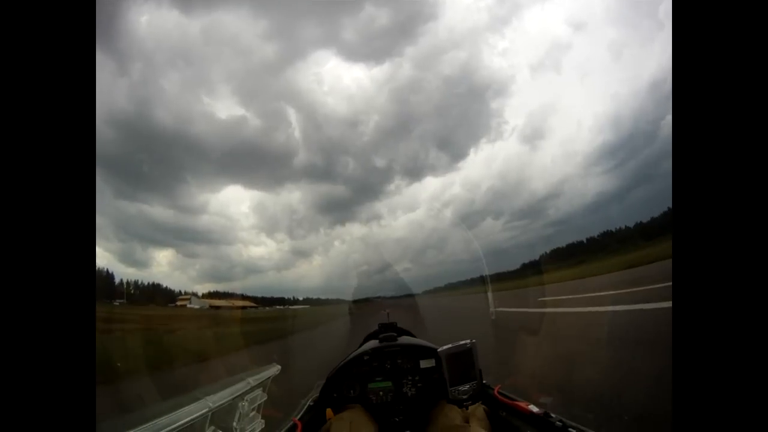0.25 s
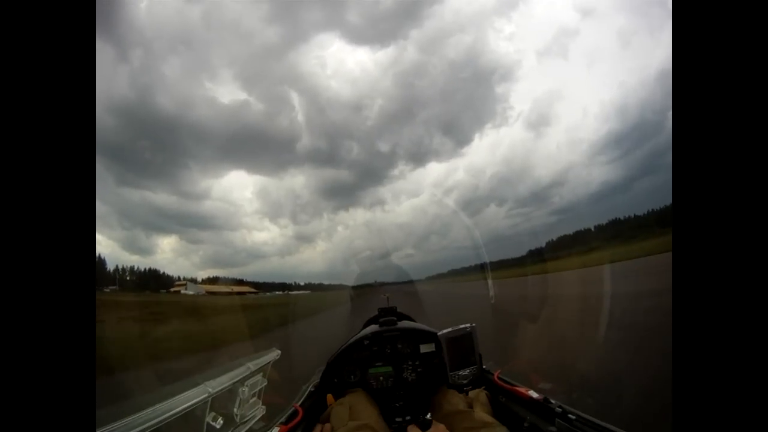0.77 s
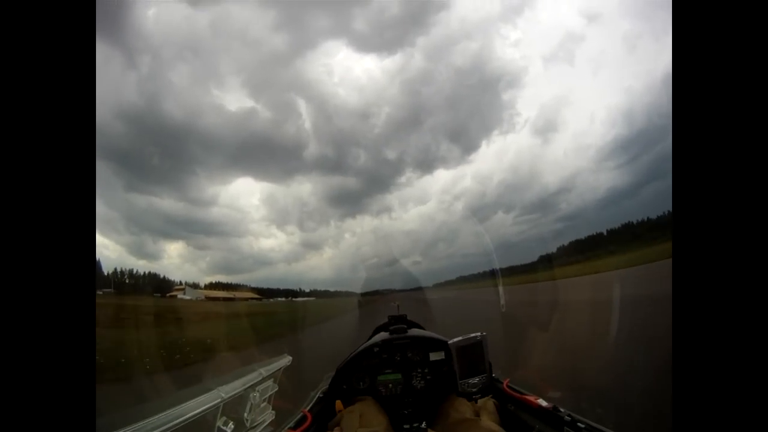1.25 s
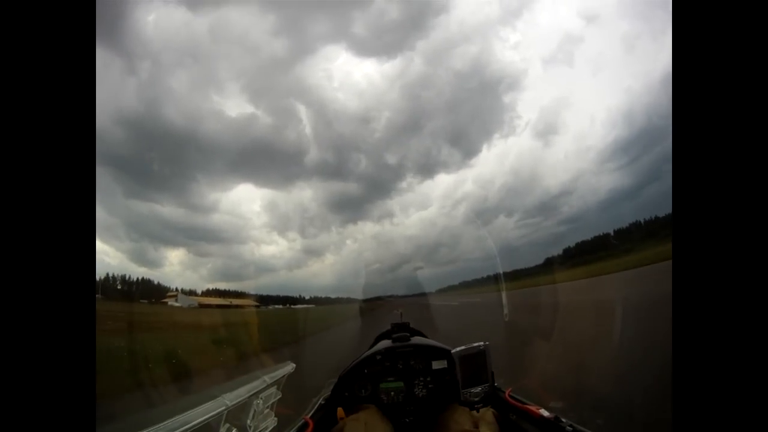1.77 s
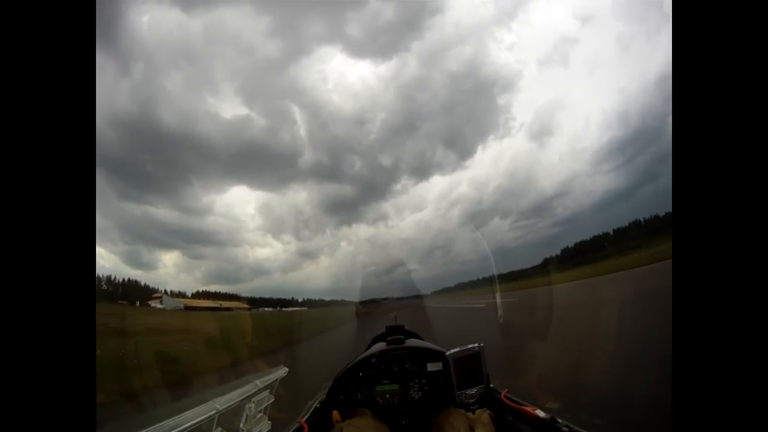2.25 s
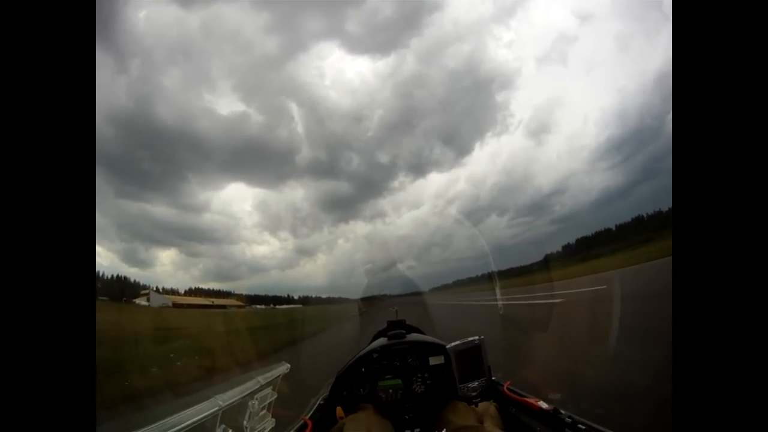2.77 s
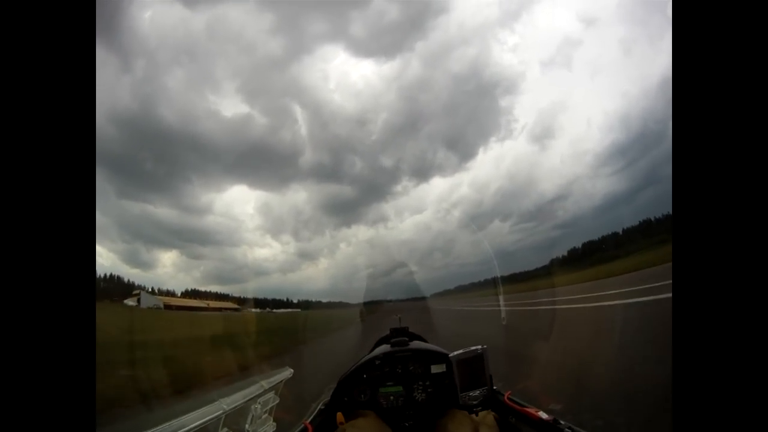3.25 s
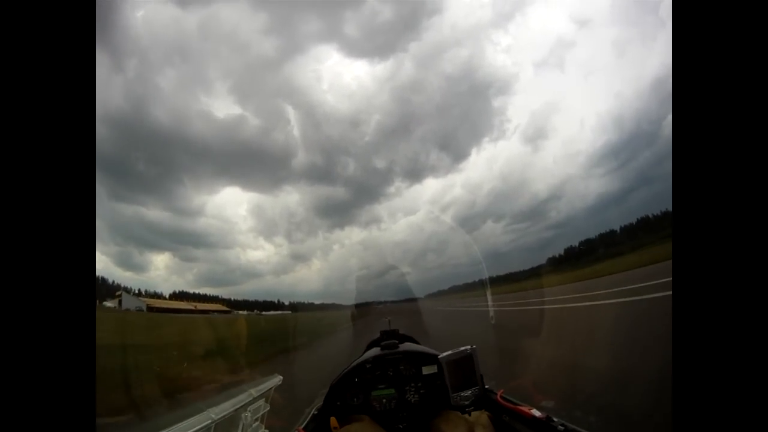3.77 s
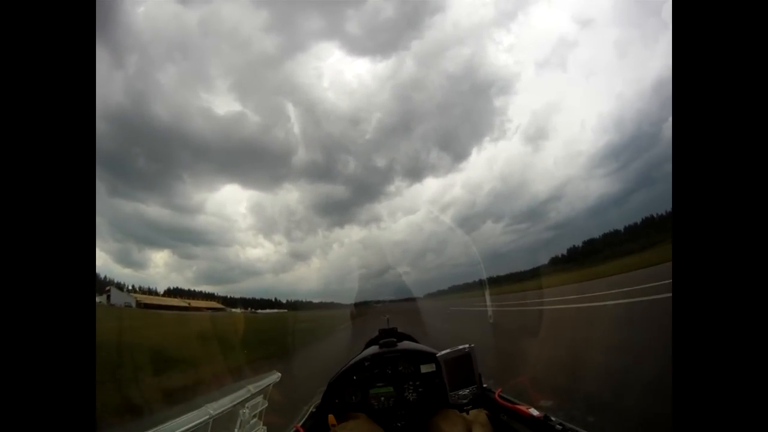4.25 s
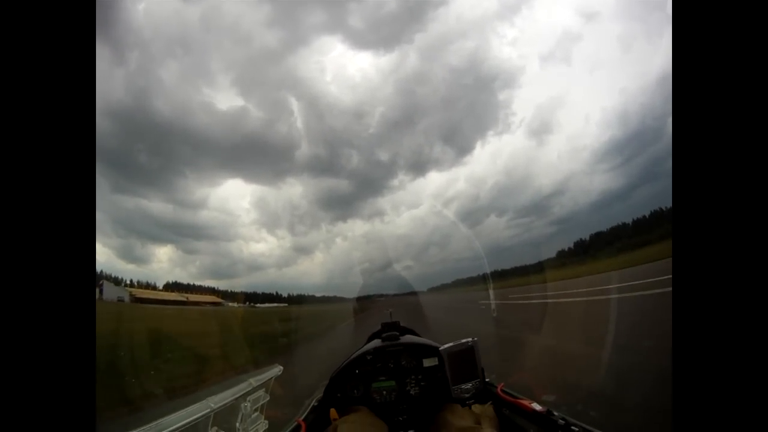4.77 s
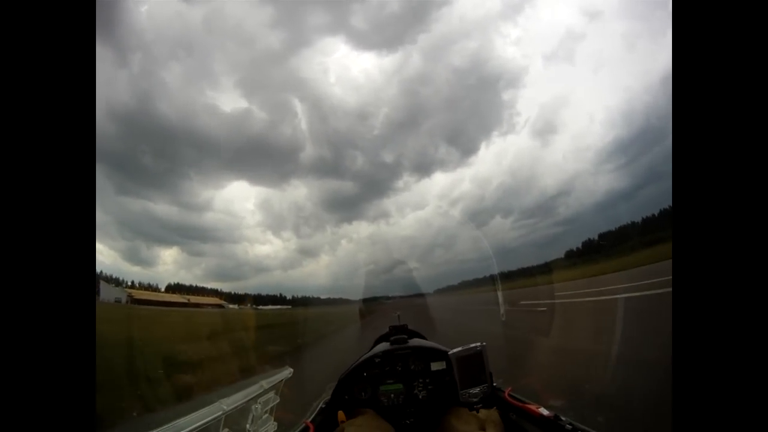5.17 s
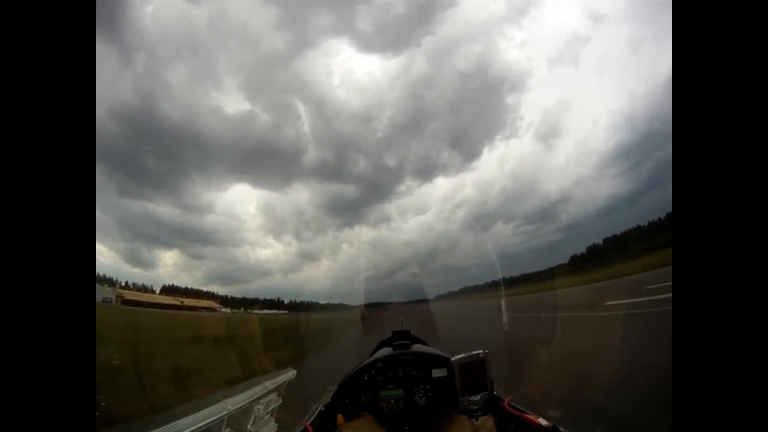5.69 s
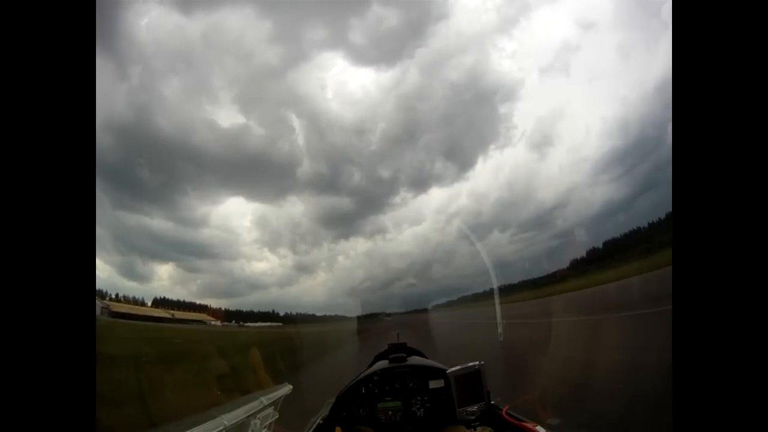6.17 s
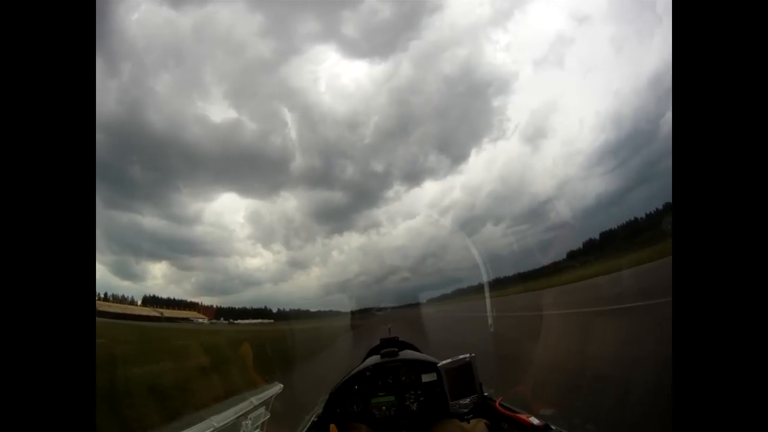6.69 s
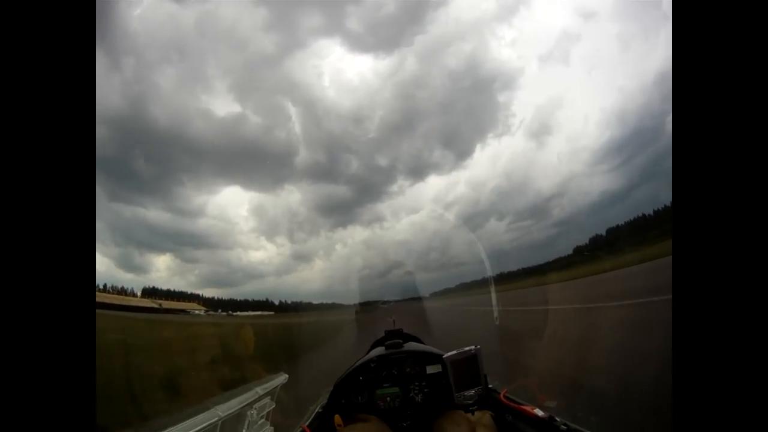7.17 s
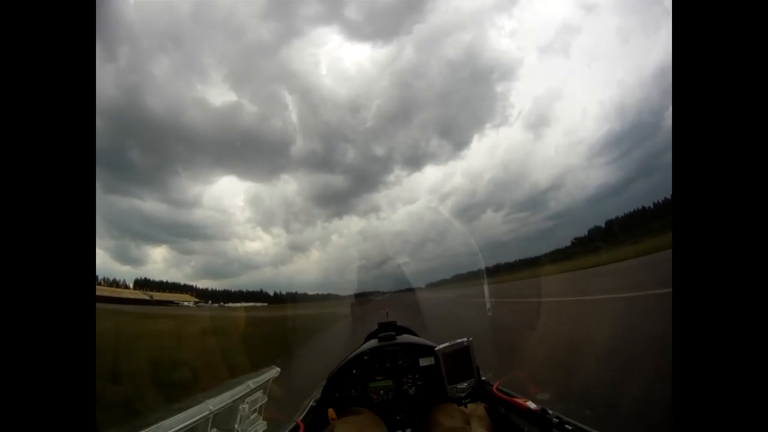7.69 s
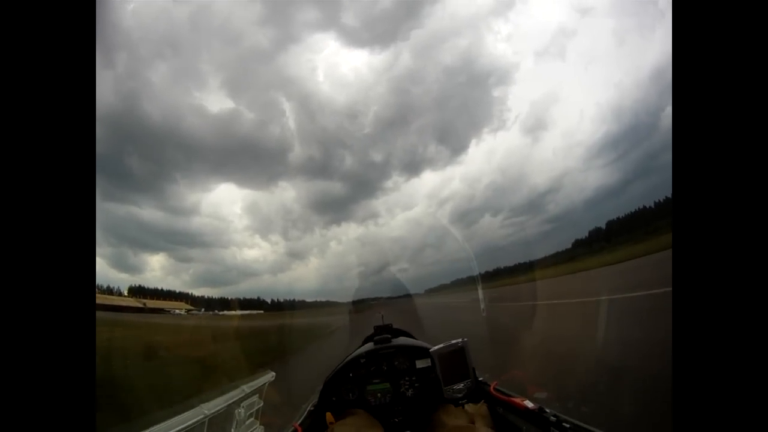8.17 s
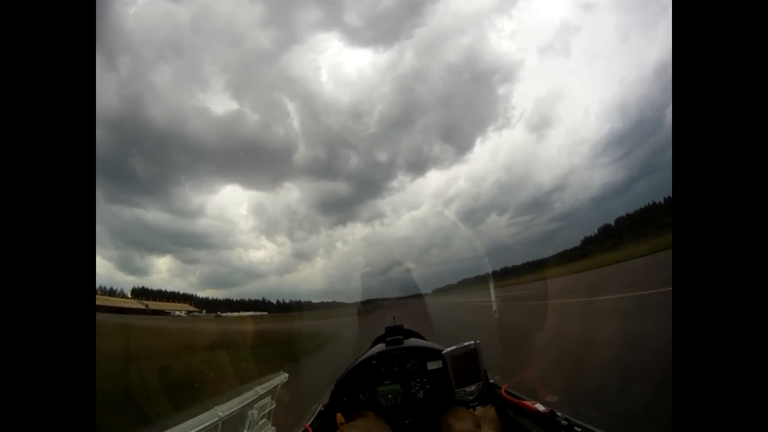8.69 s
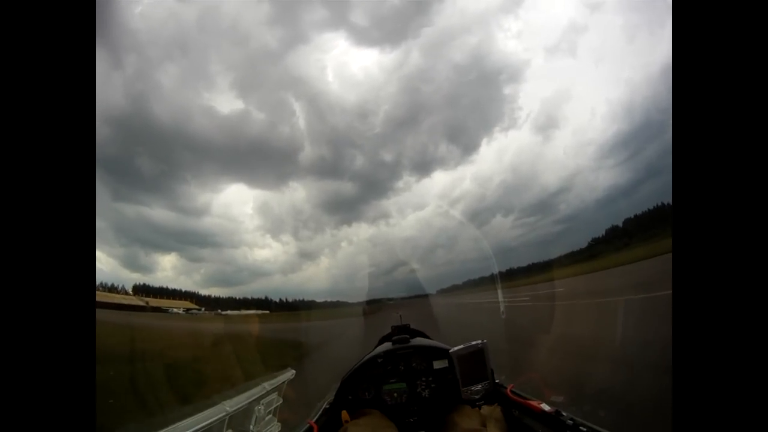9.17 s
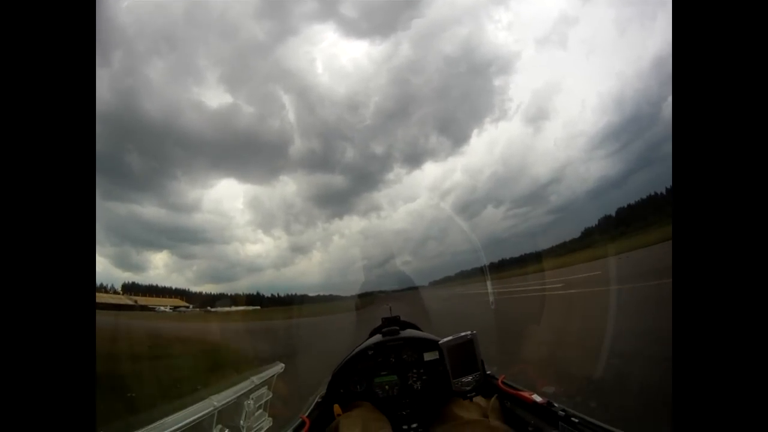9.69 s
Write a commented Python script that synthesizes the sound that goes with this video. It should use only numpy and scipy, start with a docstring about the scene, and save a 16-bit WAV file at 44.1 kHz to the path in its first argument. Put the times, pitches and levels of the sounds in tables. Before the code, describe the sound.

Inside a glider rolling along a runway, boomy low rumble and muffled air rush, with a loose panel knocking and small rattles.

```python
"""A boomy rumble and a rush of air are heard first: the cabin of a glider rolling out along a runway.
Filtered noise gives the air over the canopy, the tyre's roar, the hollow fuselage and its drumming skin.
Harmonics of an unevenly slowing rotation give the wheel's throb. Bursts of contact noise excite damped
modes: a loose panel knocks, a latch snaps, metal fittings clink. Grit ticks, cloth rustles, a rod scrapes.
The camera evens the level, samples at a low rate and holds each sample, which adds a thin sizzle."""
import sys
import numpy as np
from scipy import signal
from scipy.fft import rfft, irfft, next_fast_len
from scipy.io import wavfile
from scipy.ndimage import uniform_filter1d, map_coordinates

SR = 44100
rng = np.random.default_rng(int(sys.argv[2]) if len(sys.argv) > 2 else 0)


def output_pcm(signal):
    """Save a mono or channel-first signal as 16-bit PCM at the path in sys.argv[1].

    Samples are clipped to [-1, 1] before scaling.
    """
    pcm = np.clip(np.atleast_2d(signal).T, -1, 1) * 32767
    wavfile.write(sys.argv[1], SR, np.round(pcm).astype(np.int16))


N = 438354

# Levels are relative; the functions add their own gains.
# air noise and tyre roar along the runway: [t/s, roar level/dB, air level/dB]
RUNWAY_LEVELS = [(0, -38.5, -59.5), (0.4, -39, -65.5), (1.2, -38.5, -64), (1.65, -38.5, -63.5),
                 (1.9, -37, -59), (2.1, -39.5, -60.5), (2.45, -35.5, -62.5), (3.05, -38.5, -61.5),
                 (3.5, -38, -63), (4.1, -38.5, -63), (4.55, -40.5, -65), (5.35, -36.5, -61),
                 (5.8, -40.5, -65.5), (6.3, -38, -61.5), (7.5, -40, -64.5), (8.5, -38, -61.5),
                 (9.1, -42.5, -63.5), (9.94, -39.5, -60)]
# shell and cockpit: [t/s, rumble level/dB, boom level/dB]
HULL_LEVELS = [(0, -32, -29), (1.2, -30.5, -29), (2.3, -30, -31), (3.2, -27.5, -29.5), (4.2, -31, -28.5),
               (5.2, -28, -32), (6.3, -30.5, -28), (7.3, -29, -30.5), (8.6, -28.5, -31.5),
               (9.3, -27.5, -26.5), (9.94, -29, -32.5)]
# bumps, or dips where negative: [t/s, change of roar level/dB, change of boom level/dB]
BUMPS = [(0.019, 4, 9), (0.45, 3.5, 0.5), (0.63, 4, -0.5), (0.75, -5.5, 1.5), (0.92, 3, 2),
         (1.14, 5.5, -0.5), (1.39, -6.5, -8.5), (1.68, -10.5, -5), (2.07, -7, -5.5), (2.141, 2, 7),
         (2.2, -7.5, -6), (2.74, 4.5, 1.5), (3.15, 0.5, -7.5), (4.31, 1, 1.5), (4.82, 4.5, 6),
         (4.971, -4, -4), (5.09, 2, 9), (5.16, -6.5, -2), (5.53, 4, 6.5), (6.02, 5.5, -3), (6.13, 0, 3),
         (6.671, 3, -1), (7.41, 3, 5), (7.52, -4.5, 0.5), (7.66, 1.5, 6.5), (7.86, 4.5, 8), (8.05, -7, -4),
         (8.16, 3.5, 6.5), (8.24, -2.5, -2), (8.35, 5.5, 6), (8.639, -1.5, -6.5), (8.79, 5.5, -2.5)]
BUMP_S, AIR_SHARE = 0.029, 0.4  # time scale of a bump (s); share of its roar change (in dB) given to the air
# noise spectra of shell, tyre and canopy air: [f/Hz, spectral level/dB]
RUMBLE_SPECTRUM = [(22, -34), (44, -21), (58, -4.5), (78, -6.5), (101, 1), (134, -4.5), (153, -5.5),
                   (175, -5), (198, -11), (310, -21.5), (620, -76.5), (1500, -120)]
ROAR_SPECTRUM = [(250, -27), (380, -3), (425, 1.5), (490, -3), (600, -5), (660, -12), (705, -10),
                 (750, -17.5), (900, -25.5), (1200, -41), (4000, -110)]
AIR_SPECTRUM = [(320, -13), (820, -1), (1060, 1.5), (1300, 0.5), (1560, -5.5), (2120, -4), (2580, -11.5),
                (2960, -5.5), (3450, -15.5), (4050, -16), (4700, -23), (5800, -21.5)]
# air resonances of the cockpit: [f/Hz, width/Hz, level/dB]
COCKPIT_RESONANCES = [(232, 38.7, -4.5), (285.5, 24, -1.5), (297.5, 27.5, -2), (350, 36, -13)]
# resonances of the thin skin: [f/Hz, width/Hz, level/dB]
SKIN_RESONANCES = [(605, 65, -1), (688, 40, -4)]
SKIN_DB, SKIN_FALL_DB_PER_S = -46, 1.5  # level at the start, before bumps, and its steady fall

# rotation of the wheel: [t/s, rotation f/Hz]
WHEEL_ROTATION = [(0, 15.1), (1, 15.1), (1.9, 14.1), (2.6, 15.2), (3.3, 16.3), (4, 11.6), (5, 9.8),
                  (6, 10.3), (7, 11.2), (8, 2.45), (9.94, 4.9)]
# wheel throb and ground shudder: [t/s, throb level/dB, shudder level/dB]
WHEEL_LEVELS = [(0, -28.5, -54), (1.7, -31, -53), (2.4, -28.5, -32), (3, -39.5, -34.5), (4.2, -33.5, -35.5),
                (5.3, -33, -41), (6.3, -36, -37), (7.2, -32.5, -44.5), (8.2, -46.5, -42), (9.94, -53, -37)]
# unevenness of the tyre: [multiple of the rotation f, level/dB]
TYRE_HARMONICS = [(2, -15), (3, -6), (4, -13), (5, -4.5), (6, -13.5), (7, -5), (9, 0)]
# transmission of the landing gear: [f/Hz, gain level/dB]
GEAR_RESPONSE = [(15, -18.5), (22, -6), (30, 1), (42, -23), (58, -4), (75, 2), (95, -11.5), (110, -17.5),
                 (135, -11)]
# shudder of the ground: [f/Hz, spectral level/dB]
SHUDDER_SPECTRUM = [(10, -20), (20, 6.5), (29, 9.5), (45, 6.5), (60, 16.5), (80, -12), (160, -52),
                    (500, -120)]

# specks of grit that tick clearest: [t/s, level/dB]
CLEAR_SPECKS = [(2.481, -55), (3.19, -51), (4.351, -54), (5.309, -53.5), (5.359, -50.5), (5.4355, -42),
                (5.438, -44.5), (6.206, -47.5), (7.434, -54), (8.401, -57), (8.585, -51), (8.802, -45)]
# response of the belly to grit: [f/Hz, level/dB]
GRIT_RESPONSE = [(800, -30), (2500, -4), (4300, 8), (6000, -11.5)]
# short dry rustles: [t/s, level/dB, time scale/s]
RUSTLES = [(0.2, -64, 0.029), (1.098, -63, 0.02), (1.471, -62.5, 0.028), (2.93, -61, 0.034),
           (2.965, -56, 0.009), (3.907, -59, .025), (5.32, -63, 0.036), (5.523, -61, 0.023),
           (6.472, -56.5, 0.022), (6.731, -60.5, .03), (6.87, -62.5, 0.021), (8.011, -58.5, 0.032),
           (8.301, -57.5, 0.011), (8.736, -57.5, .035), (8.957, -63, .02)]
# spectrum of a rustle: [f/Hz, spectral level/dB]
RUSTLE_SPECTRUM = [(700, -27), (1500, -3), (2200, -2), (3000, 3.5), (3600, -6.5), (4400, -9.5), (5500, -19)]

# knocks of the loose panel: [t/s, level/dB]
PANEL_KNOCKS = [(0.621, -38.5), (0.8893, -39), (0.9134, -40.5), (1.27, -47), (1.6063, -45), (1.701, -47),
                (1.8364, -48), (1.9051, -38.5), (1.9316, -41), (2.2475, -38), (2.385, -35.5),
                (2.428, -36.5), (2.501, -46.5), (2.5388, -34.5), (2.5554, -37.5), (2.593, -46),
                (2.6266, -33.5), (2.707, -42), (2.725, -41), (2.7427, -33), (2.8449, -38.5), (2.895, -45.5),
                (2.915, -42.5), (2.9913, -35), (2.999, -36.5), (3.036, -39.5), (3.0724, -36), (3.099, -45),
                (3.1135, -40.5), (3.1433, -35), (3.204, -35.5), (3.3534, -39), (3.7965, -40.5),
                (3.9461, -40), (3.991, -40), (4.0425, -32.5), (4.06, -42), (4.106, -35), (4.1887, -36),
                (4.2034, -38), (4.2781, -44), (4.307, -35), (5.22, -46.5), (5.4, -33.5), (5.507, -39.5),
                (6.1935, -43), (6.2696, -45), (7.1866, -41.5), (7.269, -37), (8.1224, -36), (8.133, -39),
                (8.3358, -41), (8.4342, -36.5), (8.7997, -39.5), (8.9317, -44.5), (9.3368, -43.5),
                (9.6954, -42.5)]
MIDDLING_DB, RING_LOSS = -38.5, 0.31  # a middling knock; dB of ring lost, beside the crack, per dB above it
CALMING_DB_PER_S = 0.8  # steady fall of the panel's ring and buzz
# rise (s), time pressed against the frame (s), then 60 dB decay time once it parts (s)
KNOCK_RISE_S, KNOCK_HOLD_S, KNOCK_T60 = 0.002, 0.007, 0.033
# broad response of the panel: [f/Hz, level/dB]
PANEL_RESPONSE = [(150, -40), (380, 2.5), (490, 4.5), (590, 25.5), (680, 1.5), (790, 11.5), (930, -6.5),
                  (1100, 0.5), (1300, -0.5), (1700, -5), (2900, -7.5), (3500, -19.5), (4050, -21),
                  (4700, -34.5), (5500, -42.5)]
# damped modes of the panel: [f/Hz, level/dB, 60 dB decay time/s]
PANEL_MODES = [(583, -5, 0.057), (578, 1.5, 0.05), (629, 5, 0.064), (660, -2, 0.05), (960, -17.5, 0.06),
               (1170, -20, .03), (1210, -15, 0.058), (1270, -10, 0.051), (1300, -16, 0.045),
               (1790, -19, 0.05), (2180, -22, 0.056), (2550, -19.5, 0.037), (2800, -18, .05),
               (3050, -23, 0.047), (3860, -21, 0.047)]
# damped modes of the frame in its dull thud: [f/Hz, level/dB, 60 dB decay time/s]
FRAME_MODES = [(575, -5.5, 0.025), (644, 2.5, 0.061), (705, -4, 0.04)]

# snaps of a latch: [t/s, level/dB, relative level of the shiver/dB]
LATCH_SNAPS = [(5.4752, -41, -4.5), (7.271, -44, -24)]
# damped modes of the latch: [f/Hz, level/dB, 60 dB decay time/s]
LATCH_MODES = [(1880, -9, .02), (2180, -4, 0.032), (2810, 5, 0.044), (3030, -2.5, .05), (3380, -5, .02),
               (3860, -9.5, .02), (4930, -12, 0.014)]
# control rod rubbing in its guide: [t/s, level/dB, squeak f/Hz]
ROD_SCRAPE = [(6.03, -92, 3898.5), (6.065, -69, 3900.5), (6.11, -61, 3702.5), (6.148, -60.5, 3718.5),
              (6.163, -65, 4888.5), (6.2, -76, 4500.5), (6.24, -91.5, 4497)]
# resonances of the rubbing: [f/Hz, width/Hz, level/dB]
ROD_RESONANCES = [(2800, 800, -0.5), (3690, 260, -5.5), (4250, 460, -6), (4860, 340, -3.5),
                  (5330, 420, -6.5)]
# clinks of a metal fitting: [t/s, level/dB]
FITTING_CLINKS = [(7.5045, -44.5), (7.559, -42.5), (7.702, -50), (7.735, -51), (7.8475, -48.5),
                  (7.976, -42), (8.0286, -44.5)]
# damped modes of the fitting: [f/Hz, level/dB, 60 dB decay time/s]
FITTING_MODES = [(1020, -11, 0.056), (2200, -1.5, .05), (2300, -1, 0.05), (2560, -5.5, .04),
                 (2810, -2.5, .04), (2950, -4.5, .035), (3100, -5.5, 0.033), (3330, -5.5, .03),
                 (4000, -9.5, .035), (4400, -17.5, .03)]
# broad rasp of the fitting: [f/Hz, level/dB]
FITTING_RASP = [(900, -17), (1600, -8), (2200, -2), (2900, -2), (3500, -7), (4100, -8.5), (5600, -14.5)]

# camera gain control: threshold (dB), share of the excess removed, averaging time (s)
LIMIT_DB, SQUEEZE, LEVEL_S = -25, 0.44, 0.04
EDGE_HZ, HOLD_HZ, TOP_HZ = 5450, 12000, 15500  # filter before sampling, sampling rate, final cut-off


def amp(db):
    """Logarithmic level: decibels to amplitude ratio."""
    return 10 ** (np.asarray(db) / 20)


def unit(x):
    """Normalisation to rms 1."""
    return x / np.sqrt(np.mean(x ** 2) + 1e-20)


def along(points, hz):
    """Interpolation of (f/Hz, value) points on a logarithmic frequency axis."""
    f, values = np.transpose(points)
    return np.interp(np.log(hz + 1), np.log(f + 1), values)


def curves(rows):
    """Linear interpolation in time: one value per sample for each column after t/s."""
    s, *columns = np.transpose(rows)
    return [np.interp(np.arange(N) / SR, s, column) for column in columns]


def wobble(rate):
    """Slow random modulation: a smooth curve through random knots, rate of them a second."""
    knots = rng.standard_normal(int(N * rate / SR) + 4)
    return map_coordinates(knots, [np.arange(N) * rate / SR])


def swell(s, scale_s):
    """Gaussian envelope of height 1 centred on time s."""
    return np.exp(-np.minimum(((np.arange(N) / SR - s) / scale_s) ** 2, 50))


def filtered(x, response):
    """Linear filtering: the spectrum of x times a response of frequency."""
    size = next_fast_len(N + SR // 2)
    spectrum = rfft(x, size) * response(np.fft.rfftfreq(size, 1 / SR))
    return irfft(spectrum, size)[:N]


def rush(spectrum):
    """Spectral shaping: Gaussian noise of rms 1 with the given spectrum."""
    return unit(filtered(rng.standard_normal(N), lambda hz: amp(along(spectrum, hz))))


def resonant(modes):
    """Resonance: noise of rms 1 gathered in peaks whose powers add."""
    def response(hz):
        power = 0
        for centre, width, db in modes:
            offset = (hz - centre) / (width / np.sqrt(2))
            power = power + amp(db) ** 2 / (1 + offset ** 2) ** 2
        return np.sqrt(power)
    return unit(filtered(rng.standard_normal(N), response))


def struck(spectrum, size=4096):
    """Minimum phase: the causal impulse response, of energy 1, that has this spectrum."""
    cepstrum = irfft(np.log(amp(along(spectrum, np.fft.rfftfreq(size, 1 / SR)))))
    # folding the cepstrum onto positive times makes the response causal
    cepstrum[1:size // 2] *= 2
    cepstrum[size // 2 + 1:] = 0
    response = irfft(np.exp(rfft(cepstrum)))
    return response / np.linalg.norm(response)


def add(track, s, sound):
    """Superposition: mix a sound into the track at time s."""
    part = track[max(round(s * SR), 0):][:len(sound)]
    part += sound[:len(part)]


def chatter(t60, grit):
    """Random micro-contact: a decaying noise burst of energy 1, spikier with more grit."""
    t = np.arange(SR // 8) / SR
    sizes = np.exp(grit * rng.standard_normal(len(t)))
    burst = rng.standard_normal(len(t)) * sizes * amp(-60 * t / t60)
    return burst / np.linalg.norm(burst)


def ringing(modes, spread_db):
    """Modal superposition: damped sines of energy 1 in all, with random strengths at each call."""
    t = np.arange(SR // 6) / SR
    ring = np.zeros(len(t))
    for hz, db, t60 in modes:
        ring += amp(db + spread_db * rng.normal() - 60 * t / t60) * np.sin(2 * np.pi * hz * t)
    return ring / np.linalg.norm(ring)


def fuselage():
    """Broadband excitation and resonance: shell rumble, cockpit boom, tyre roar, drumming skin and air."""
    roar_db, air_db = curves(RUNWAY_LEVELS)
    rumble_db, boom_db = curves(HULL_LEVELS)
    bump_db, heave_db = sum(np.outer(changes_db, swell(s, BUMP_S)) for s, *changes_db in BUMPS)
    flutter_db = 2.0 * wobble(55) + 0.5 * wobble(13)
    shake_db = bump_db + flutter_db
    skin_db = SKIN_DB - SKIN_FALL_DB_PER_S * np.arange(N) / SR
    rumble = amp(rumble_db + 1.3 * wobble(16)) * rush(RUMBLE_SPECTRUM)
    boom = amp(boom_db + heave_db + 1.4 * wobble(16)) * resonant(COCKPIT_RESONANCES)
    roar = amp(roar_db + shake_db) * rush(ROAR_SPECTRUM)
    skin = amp(skin_db + shake_db) * resonant(SKIN_RESONANCES)
    air = amp(air_db + 2.0 + AIR_SHARE * bump_db + flutter_db) * rush(AIR_SPECTRUM)
    return rumble + boom + roar + skin + air


def wheel():
    """Periodic forcing: tyre harmonics weighted by the gear's response, plus the ground's random shudder."""
    rotation_hz, = curves(WHEEL_ROTATION)
    throb_db, shudder_db = curves(WHEEL_LEVELS)
    angle = 2 * np.pi * np.cumsum(rotation_hz) / SR
    shake = np.zeros(N)
    for multiple, db in TYRE_HARMONICS:
        order = round(multiple)
        phase = order * angle + rng.uniform(0, 2 * np.pi) + 0.085 * wobble(1.8)
        gain_db = db + along(GEAR_RESPONSE, order * rotation_hz) + 3.4 * wobble(4.0)
        shake += amp(gain_db) * np.sin(phase)
    throb = np.sqrt(2) * amp(throb_db) * shake
    return throb + amp(shudder_db) * rush(SHUDDER_SPECTRUM)


def tremble(count=260, level_db=4.0, scatter_db=2.5):
    """Random impact excitation: faint panel contacts buzz, following the air level and slowly calming."""
    _, air_db = curves(RUNWAY_LEVELS)
    contacts = np.zeros(N)
    for when, size in zip(rng.uniform(0, N / SR, count), rng.standard_normal(count)):
        add(contacts, when, amp(scatter_db * size) * chatter(t60=0.052, grit=0.45))
    body = ringing(PANEL_MODES, spread_db=7.0)
    add(body, 0, struck(PANEL_RESPONSE))
    buzz = unit(signal.fftconvolve(contacts, body)[:N])
    return amp(air_db + level_db - CALMING_DB_PER_S * np.arange(N) / SR) * buzz


def specks(count=30, level_db=-53, range_db=4.0, clear_db=9):
    """Impulsive excitation: grit flicked by the tyre ticks on the belly, clearly or faintly."""
    ticks = np.zeros(N)
    for s, db in CLEAR_SPECKS:
        add(ticks, s, amp(db + clear_db) * chatter(t60=0.012, grit=0.8))
    for when, size in rng.random((count, 2)):
        add(ticks, when * N / SR, amp(level_db + range_db * size) * chatter(t60=0.008, grit=0.89))
    return signal.fftconvolve(ticks, struck(GRIT_RESPONSE))[:N]


def rustles(grain_db=5.5):
    """Granular friction: brief strokes of unsteady noise, as of cloth shifting against the seat."""
    strokes = sum(amp(db) * swell(s, scale_s) for s, db, scale_s in RUSTLES)
    return strokes * unit(amp(grain_db * wobble(270)) * rush(RUSTLE_SPECTRUM))


def panel(ring_db=1, rebound_db=-12, rebound_s=0.014, thud_db=23.0, thud_grows=0.6, grit=0.72, colour_db=1.0):
    """Impact of damped bodies: chattering contact and a rebound excite the panel, and the frame thuds."""
    knocks, t = np.zeros(N), np.arange(SR // 8) / SR
    release = amp(-60 * np.maximum(t - KNOCK_HOLD_S, 0) / KNOCK_T60)
    pressure = np.minimum(t / KNOCK_RISE_S, 1) * release
    for s, db in PANEL_KNOCKS:
        hardness_db = db - MIDDLING_DB
        sizes = np.exp(grit * rng.standard_normal(len(t)))
        contact = pressure * rng.standard_normal(len(t)) * sizes
        contact /= np.linalg.norm(contact)
        add(contact, rebound_s * rng.uniform(0.8, 1.4), amp(rebound_db) * chatter(t60=0.042, grit=1.0))
        # harder knocks crack more and ring less
        gain_db = ring_db - RING_LOSS * hardness_db - CALMING_DB_PER_S * s
        body = amp(gain_db) * ringing(PANEL_MODES, spread_db=3.0)
        add(body, 0, struck(PANEL_RESPONSE))
        # each knock has its own slight random colour
        spot = struck([(hz, colour_db * rng.normal()) for hz, _ in PANEL_RESPONSE])
        coloured = signal.fftconvolve(contact, spot)
        add(knocks, s - KNOCK_RISE_S / 2, amp(db + 25.5) * signal.fftconvolve(coloured, body))
        onset = np.minimum(t / (2 * KNOCK_RISE_S), 1)
        thud = ringing(FRAME_MODES, spread_db=1.5)[:len(t)] * onset
        add(knocks, s, amp(MIDDLING_DB + thud_grows * hardness_db + thud_db) * thud)
    return knocks


def latch(shiver_s=0.28):
    """Impact excitation of modes: the latch snaps against its catch, then shivers."""
    snaps = np.zeros(N)
    for s, db, shiver_db in LATCH_SNAPS:
        contact = chatter(t60=0.025, grit=1.0)
        add(contact, 0.012, amp(shiver_db) * chatter(t60=shiver_s, grit=0.8))
        snap = signal.fftconvolve(contact, ringing(LATCH_MODES, spread_db=2.5))
        add(snaps, s, amp(db + 20.5) * snap)
    return snaps


def rod(squeak_db=-4, unsteady_hz=70):
    """Dry friction: resonant rubbing noise with a frequency-modulated, hoarse squeak."""
    scrape_db, squeak_hz = curves(ROD_SCRAPE)
    pitch = squeak_hz + unsteady_hz * wobble(600)
    squeak = np.sin(2 * np.pi * np.cumsum(pitch) / SR)
    rubbing = resonant(ROD_RESONANCES) + amp(squeak_db) * unit(squeak)
    return amp(scrape_db + 2.6 * wobble(170)) * rubbing


def fittings(ring_db=-1, settle_db=-6):
    """Repeated impact on metal modes: rough contact and a longer settling buzz make each clink."""
    clinks = np.zeros(N)
    for s, db in FITTING_CLINKS:
        body = amp(ring_db) * ringing(FITTING_MODES, spread_db=2.3)
        add(body, 0, struck(FITTING_RASP))
        contact = chatter(t60=0.07, grit=0.8) + amp(settle_db) * chatter(t60=0.24, grit=0.9)
        add(clinks, s, amp(db + 18.5) * signal.fftconvolve(body, contact))
    return clinks


def scene():
    """Superposition of all sources at the seat, with 4 ms ramps at both ends."""
    ease = np.minimum(np.arange(N) / (0.004 * SR), 1)
    cockpit = fuselage() + wheel() + tremble() + specks() + rustles()
    cockpit += panel() + latch() + rod() + fittings()
    return (ease * ease[::-1] * cockpit)[None]


def record(dry):
    """Compression and sample-and-hold: swells are evened, then holding leaves faint spectral images."""
    mean_square = np.abs(uniform_filter1d(dry[0] ** 2, max(int(LEVEL_S * SR), 1)))
    level_db = 10 * np.log10(mean_square + 1e-12)
    even = dry[0] * amp(-SQUEEZE * np.maximum(level_db - LIMIT_DB, 0))
    band = filtered(even, lambda hz: 1 / np.sqrt(1 + (hz / EDGE_HZ) ** 30))
    # images lie on both sides of the sampling rate; the hold weakens them by its sinc response
    mirrored = band * (1 + 2 * np.cos(2 * np.pi * HOLD_HZ * np.arange(N) / SR))
    return filtered(mirrored, lambda hz: np.sinc(hz / HOLD_HZ) * (hz < TOP_HZ))[None]


dry = scene()
out = record(dry)
output_pcm(out)
```